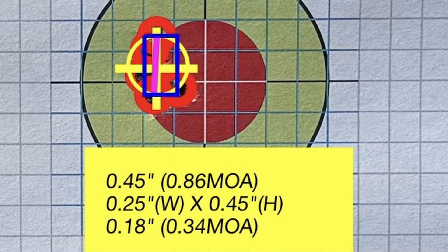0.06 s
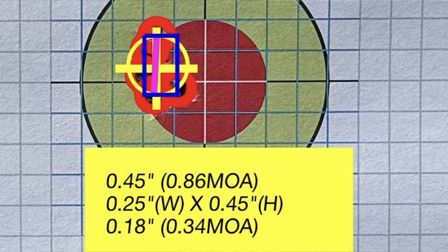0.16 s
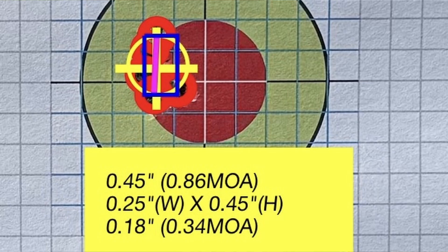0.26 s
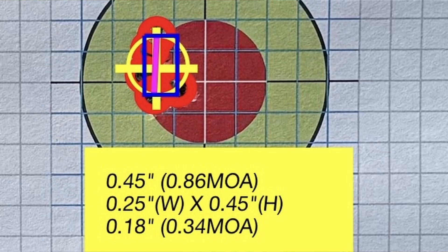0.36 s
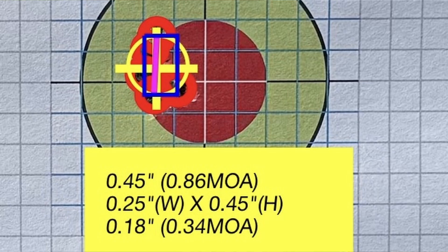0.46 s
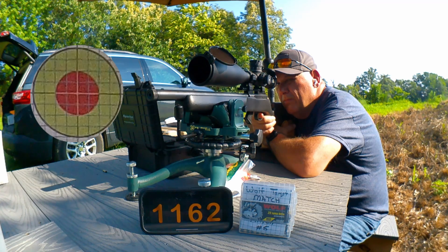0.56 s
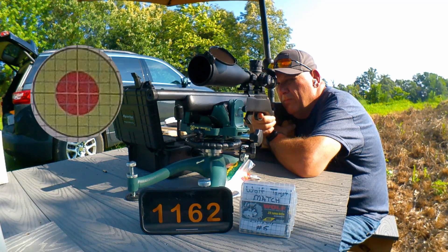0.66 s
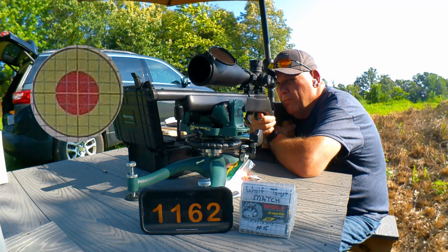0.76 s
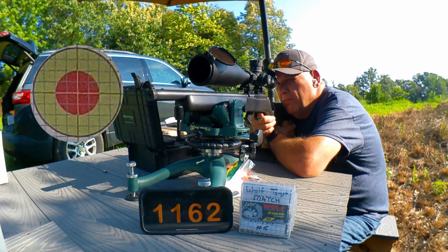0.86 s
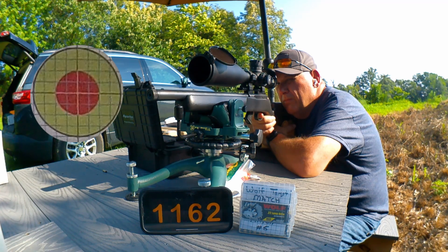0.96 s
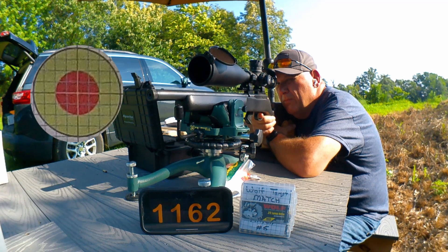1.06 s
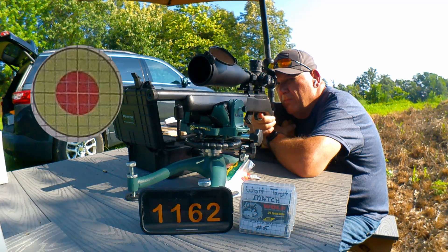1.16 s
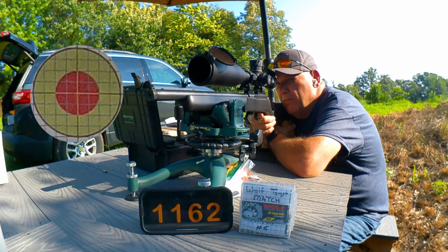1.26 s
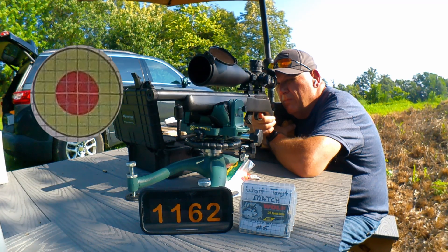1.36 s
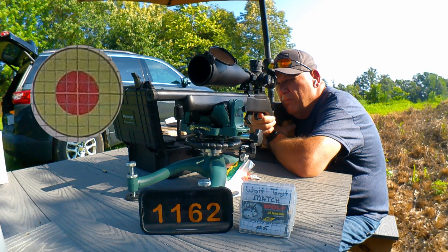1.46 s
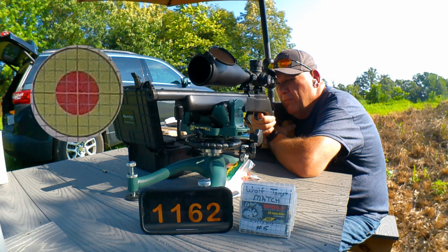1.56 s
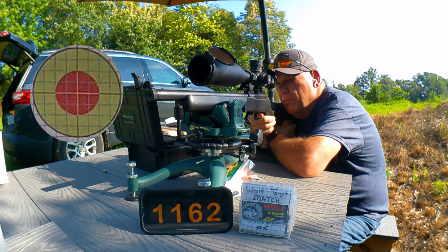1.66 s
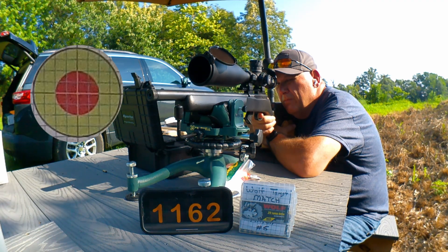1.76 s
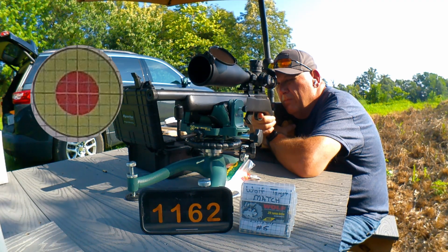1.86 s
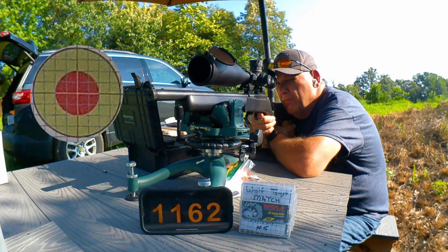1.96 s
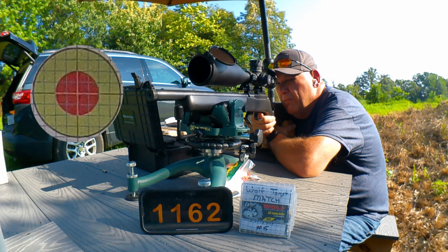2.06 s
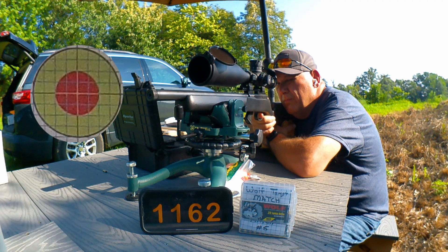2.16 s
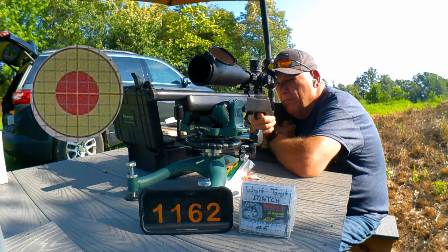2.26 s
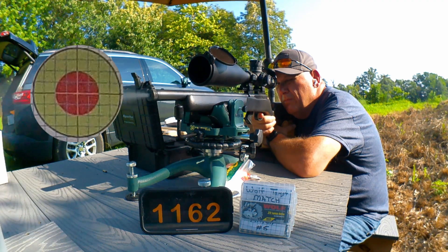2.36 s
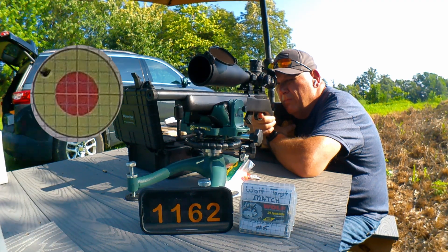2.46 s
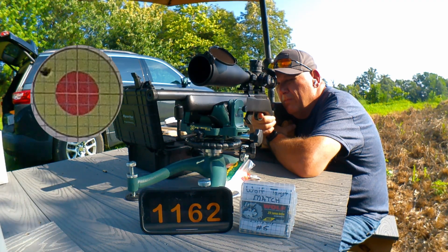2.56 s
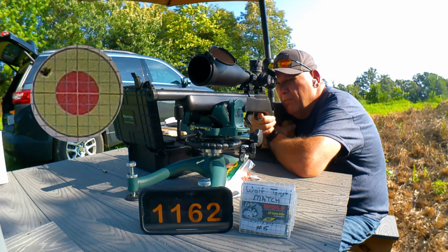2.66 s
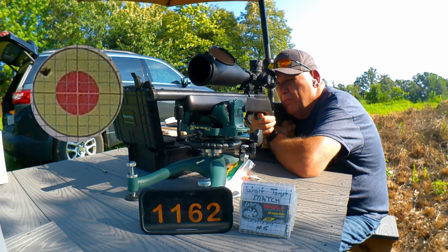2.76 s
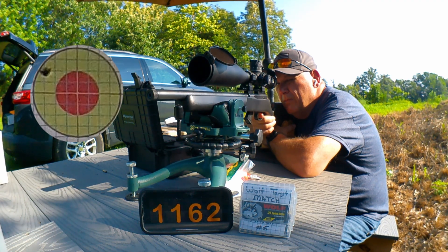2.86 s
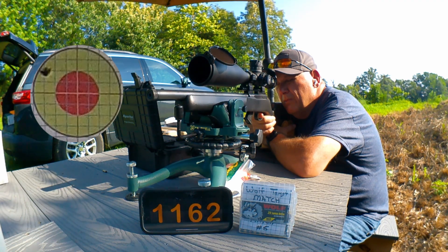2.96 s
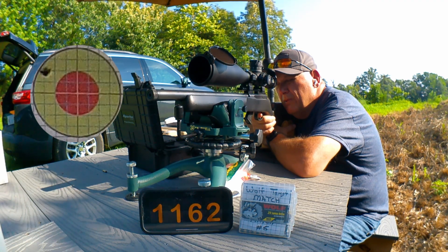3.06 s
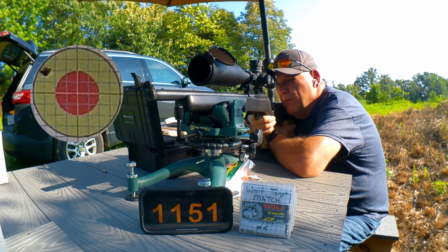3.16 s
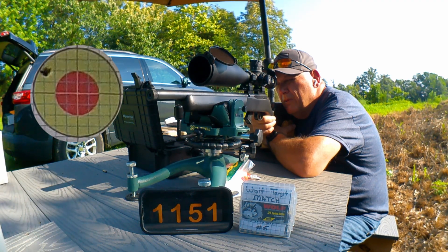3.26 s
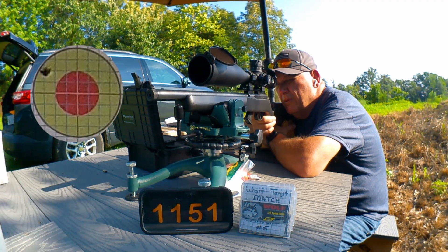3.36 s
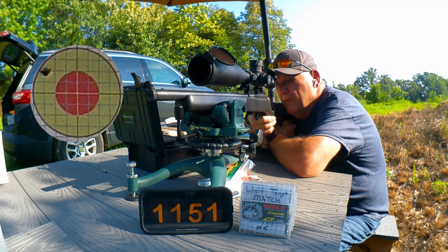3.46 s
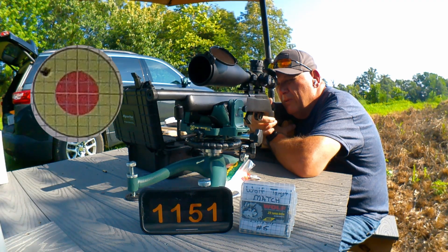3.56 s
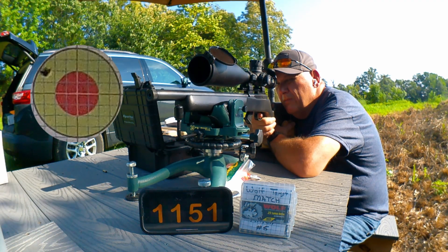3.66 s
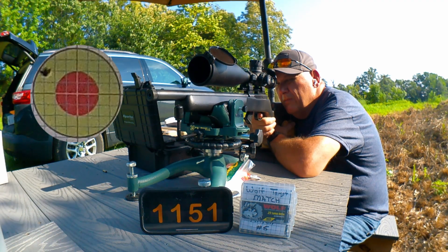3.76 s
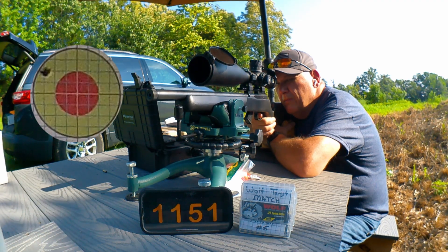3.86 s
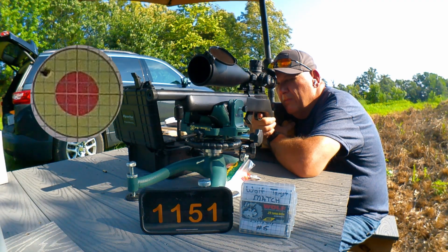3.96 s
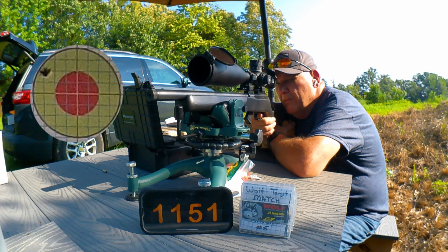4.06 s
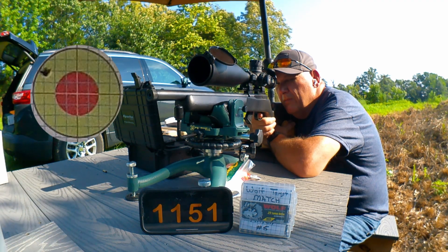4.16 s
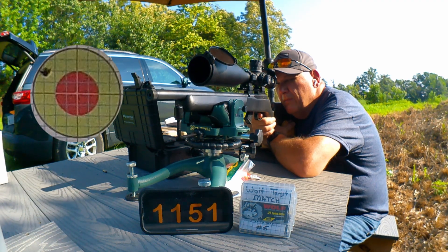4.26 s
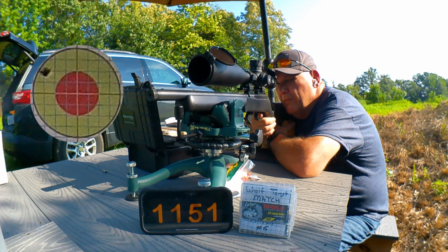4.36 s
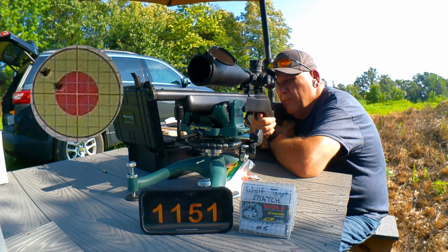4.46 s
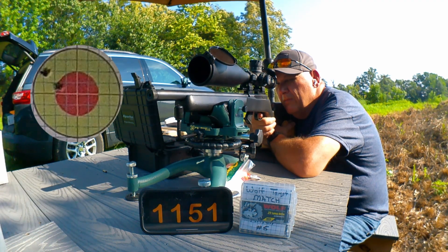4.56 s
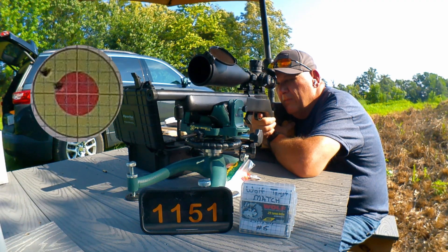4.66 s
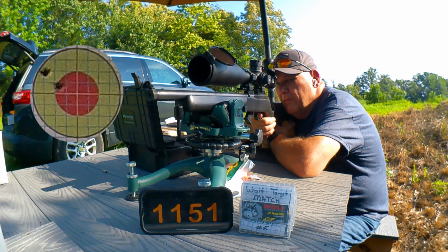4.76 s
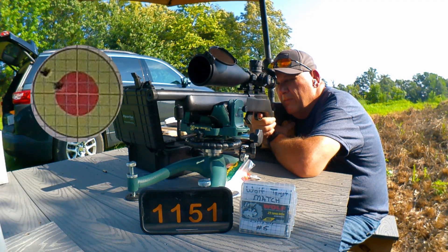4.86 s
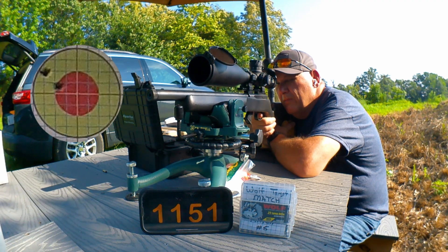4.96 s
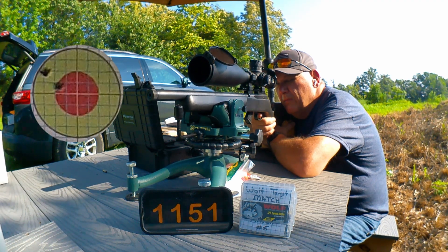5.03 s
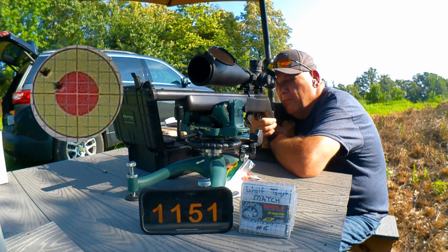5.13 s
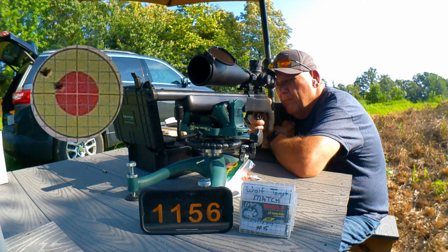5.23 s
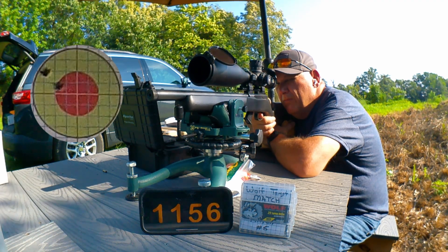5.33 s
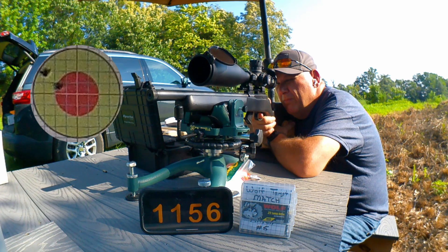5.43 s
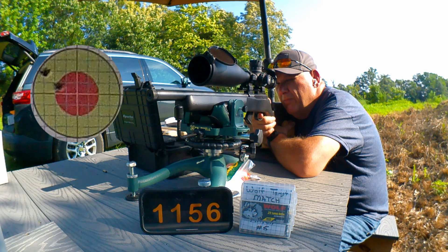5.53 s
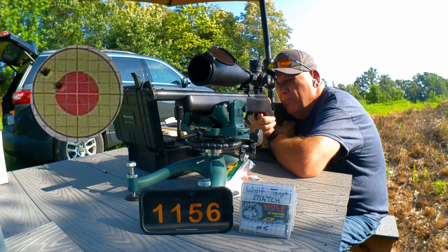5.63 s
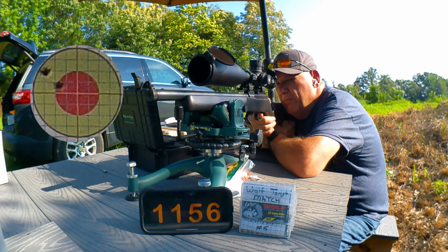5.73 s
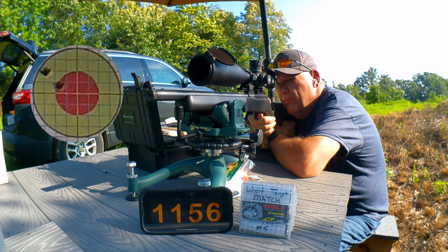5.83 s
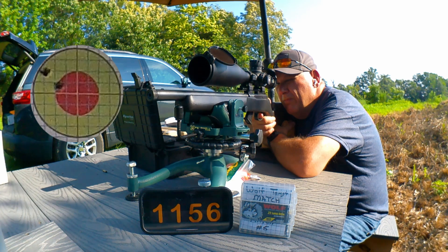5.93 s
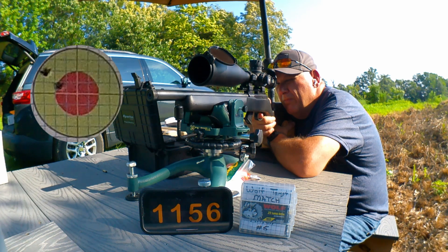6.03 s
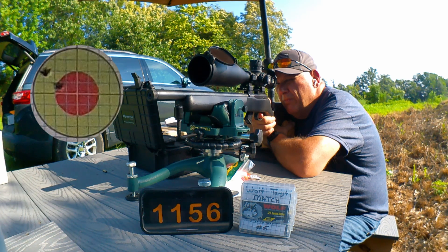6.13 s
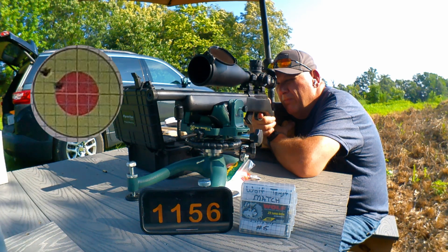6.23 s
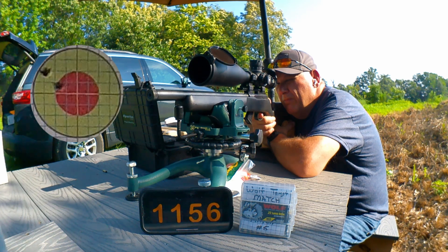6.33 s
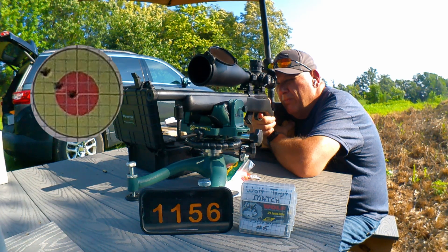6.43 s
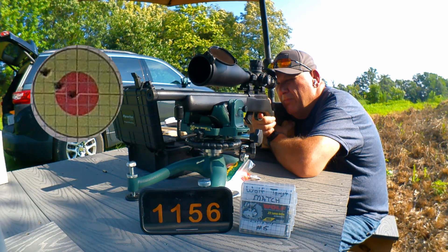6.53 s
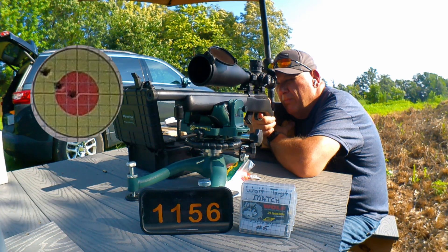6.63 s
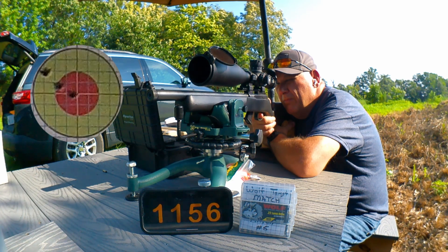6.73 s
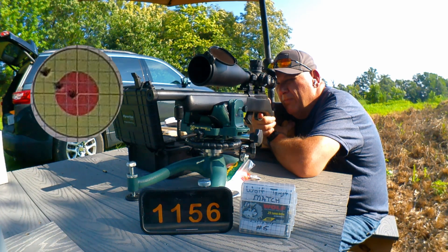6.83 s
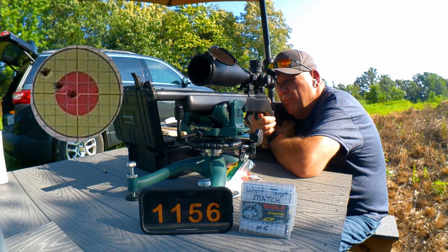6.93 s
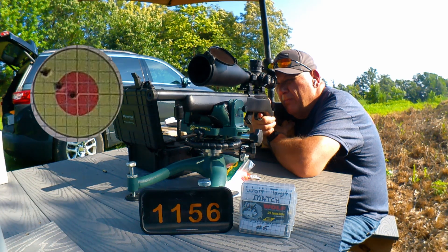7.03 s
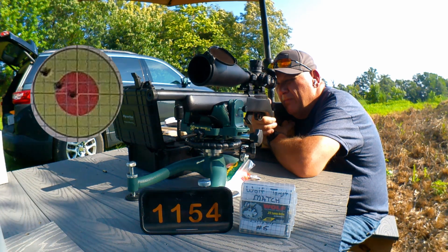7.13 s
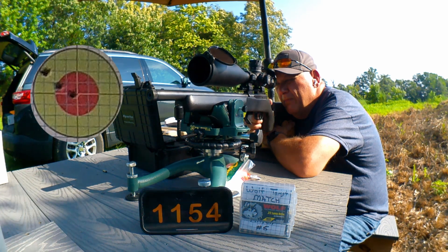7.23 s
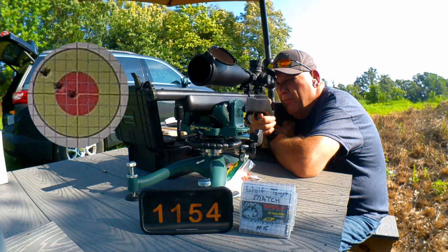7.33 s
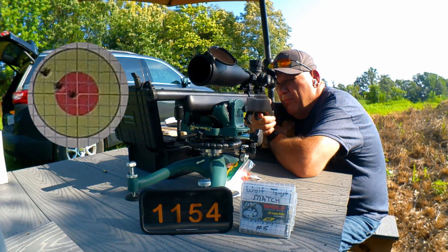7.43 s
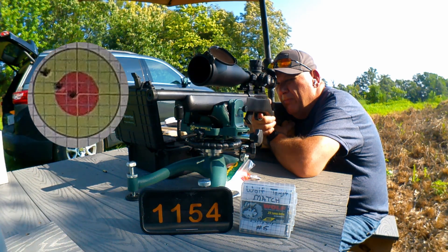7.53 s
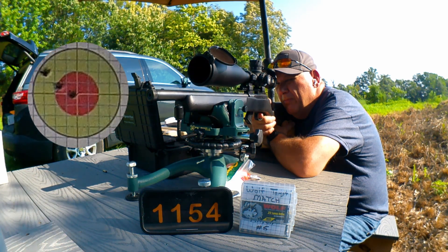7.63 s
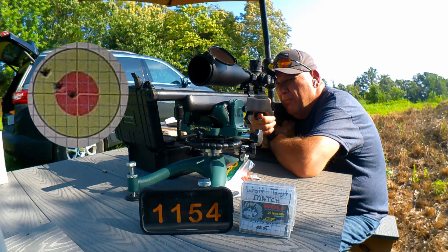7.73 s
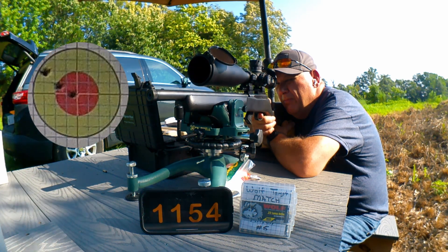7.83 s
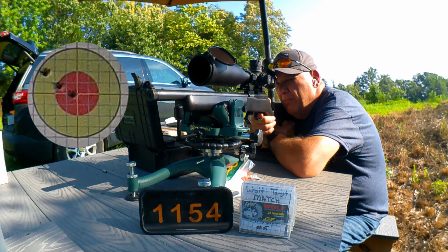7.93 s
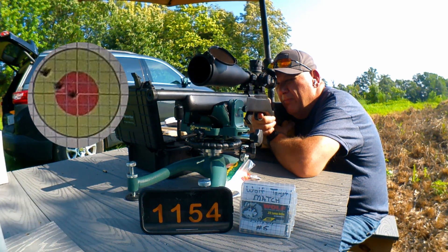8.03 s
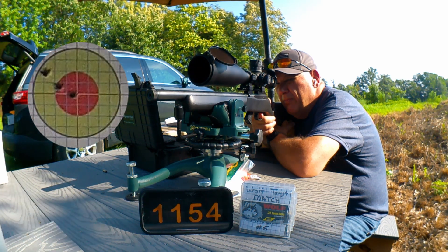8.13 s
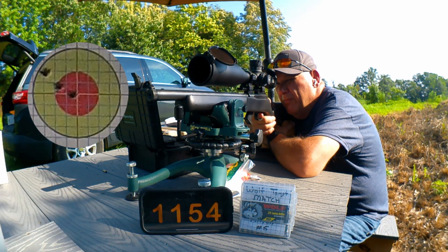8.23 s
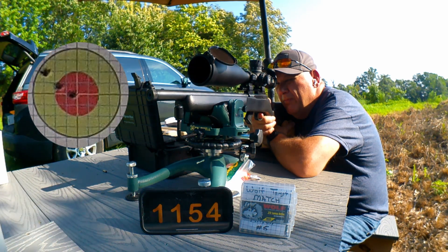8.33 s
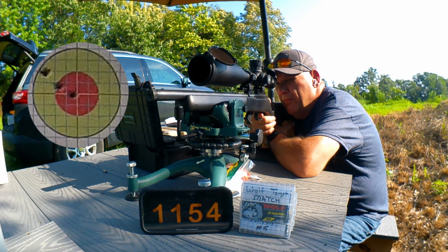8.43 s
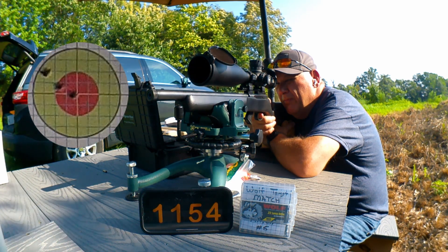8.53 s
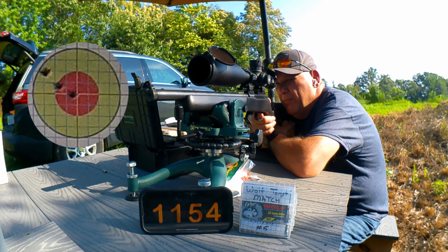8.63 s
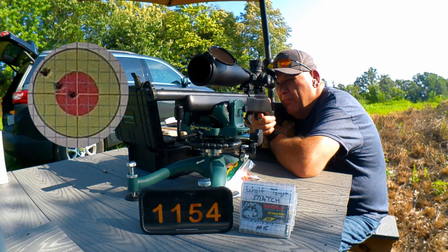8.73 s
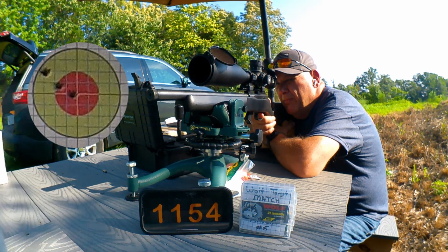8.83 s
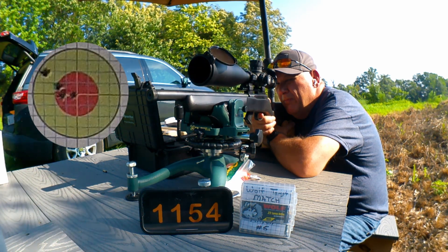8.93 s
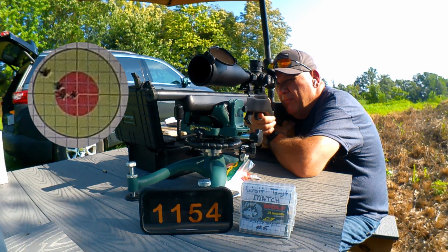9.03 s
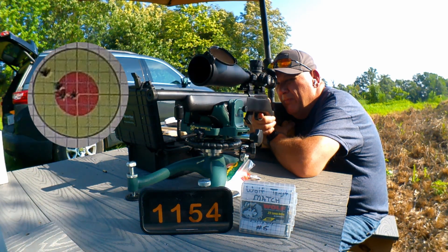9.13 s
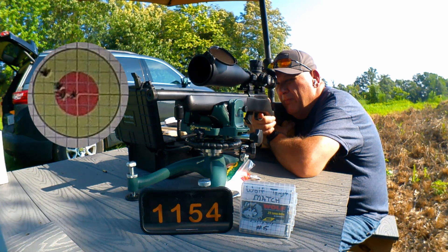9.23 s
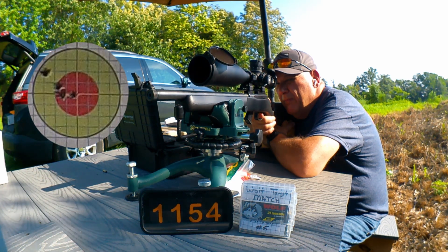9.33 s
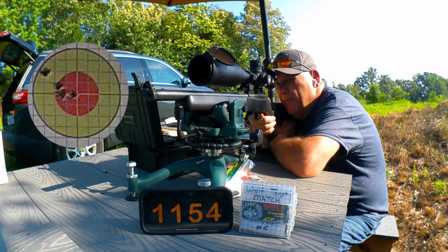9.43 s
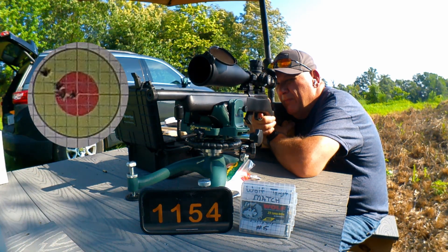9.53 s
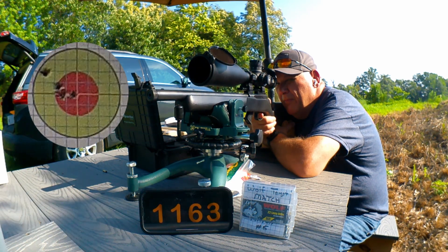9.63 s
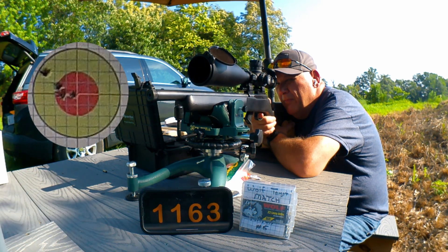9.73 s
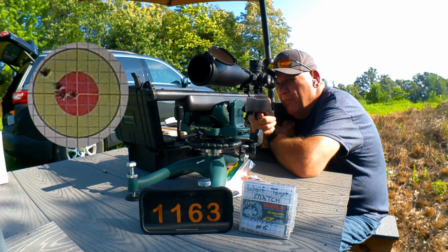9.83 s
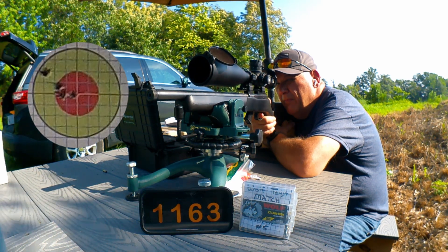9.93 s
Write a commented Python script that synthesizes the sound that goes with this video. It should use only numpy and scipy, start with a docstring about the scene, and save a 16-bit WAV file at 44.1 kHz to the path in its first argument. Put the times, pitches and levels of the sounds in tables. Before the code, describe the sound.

Quiet outdoor shooting range near woods, heard in mono from the bench. A rasping cicada cuts off early, then low wind gusts and a thin insect chorus. Four loud rifle cracks come evenly spaced, clipped at the onset, ringing briefly and washing back off grass, trees and far woods, with tails cut short. One small knock precedes the third shot, and a pulsing cicada surrounds the fourth.

```python
"""A near cicada pulses for half a second, then a far insect chorus, drone, trill and gusts lead to a rifle shot.
Four shots of a small-calibre rifle on an outdoor bench follow. In each, blast and bench ringing come first,
then the crack scattered back by the field, the target hit, and swells of noise from field, trees and far woods.
A light knock falls between the second and third; the cicada returns around the fourth.
Background levels step at the stretch bounds, which also cut the echo tails; the blasts overload the input."""
import sys
import numpy as np
from scipy import signal
from scipy.io import wavfile
from scipy.ndimage import map_coordinates

SR = 44100
rng = np.random.default_rng(int(sys.argv[2]) if len(sys.argv) > 2 else 0)


def master_out(mix):
    """Clip the mix to full scale and print it as 16-bit PCM to the path in sys.argv[1]."""
    frames = np.transpose(np.atleast_2d(mix))
    ceiling = np.clip(frames, -1, 1)
    pcm = np.round(ceiling * 32767).astype(np.int16)
    wavfile.write(sys.argv[1], SR, pcm)


N = 440559
TIME = np.arange(N) / SR
AGE = np.arange(60000) / SR  # s since the onset of a short sound
SNAP_LEAD_S = .02

# Stretches of steady background: start_s, air_db, low_insects_db, high_insects_db, drone_db, drone_hz
BACKGROUND_STRETCHES = [(0, -60, -71, -72, -68, 271), (.535, -59.5, -73.5, -67.5, -67.5, 203.9),
                        (3.61, -59, -74.5, -72.5, -73, 219.2), (5.31, -60, -74, -68, -66.5, 287.3),
                        (7.277, -57.5, -71, -75, -63, 295.2), (9.63, -57.5, -70.5, -65, -60.5, 244.5)]
# Rifle shots: start_s, crack_return_s (how long the crack keeps coming back), woods_db, last_snaps_db
RIFLE_SHOTS = [(2.3967, .1046, -3, -12.5), (4.3972, .1046, .5, -15), (6.3392, .1048, -.5, -15),
               (8.8660, .0858, 1, -15)]
# Spectrum of insect rasp, relative: freq_hz, density_db
RASP_SPECTRUM = [(1500, -14), (2200, -10), (3000, 0.5), (3500, 6.5), (4100, 5.5), (5300, 3), (6300, 0.5),
                 (7300, -5), (8600, -39.5)]


def amp(db):
    """Decibels to gain."""
    return 10 ** (np.asarray(db) / 20)


def unit(x):
    """Scales to rms 1."""
    return x / np.sqrt(np.mean(x ** 2) + 1e-20)


def add(mix, start_s, sound):
    """Mixes a sound in at start_s, truncated at the end of the mix."""
    part = mix[max(round(start_s * SR), 0):][:len(sound)]
    part += sound[:len(part)]


def dying(t60):
    """Exponential decay by 60 dB in t60 seconds."""
    return amp(-60 * AGE / t60)


def colour(x, spectrum, size=4096):
    """Minimum-phase filter of the given (Hz, dB) shape; white noise keeps its power."""
    hz, db = np.transpose(spectrum)
    bin_hz = abs(np.fft.fftfreq(size, 1 / SR))
    gain = unit(amp(np.interp(np.log(bin_hz + 1), np.log(hz + 1), db)))
    response = np.exp(np.conj(signal.hilbert(np.log(gain + 1e-6))))
    taps = np.fft.ifft(response).real
    return signal.oaconvolve(x, taps[:size // 2])[:len(x)]


def resonate(x, hz, width_hz):
    """Double-pole resonance that follows hz; shifts it to 0 Hz, filters, shifts back; output rms 1."""
    carrier = np.exp(2j * np.pi * np.cumsum(hz * np.ones(len(x))) / SR)
    r = np.exp(-np.pi * width_hz / SR)
    baseband = signal.lfilter([1], [1, -2 * r, r * r], x / carrier)
    return unit((carrier * baseband).real)


def drift(count, per_s):
    """Slow random wander of rms 1, with per_s knots a second."""
    knots = np.arange(count) * per_s / SR
    return unit(map_coordinates(rng.standard_normal(4096), [knots], order=2, mode="wrap"))


def shots(crack_db=-12, crack_t60=0.35, stop_t60=0.055, target_db=-29, target_t60=0.042, target_s=.2643,
          woods_front_db=-46.5, woods_front_t60=.1):
    """Blast, returning supersonic crack, target hit, and scattered returns from field, trees and far woods."""
    # Relative spectra: freq_hz, density_db
    crack_spectrum = [(29, -48.5), (50, -16.5), (337, -17.5), (507, -13.5), (822, -9.5), (1470, -1.5),
                      (1960, -4), (2950, -11.5), (3760, -21.5), (5270, -15), (8140, -31.5), (13500, -37),
                      (16000, -51)]
    field_spectrum = [(35, -40.5), (60, -16.5), (212, -8.5), (250, -4.5), (308, -4.5), (363, -4), (458, -5),
                      (749, -8.5), (1910, -1.5), (2470, -6), (2770, -5.5), (3760, -19.5), (5090, -9),
                      (11000, -37), (16000, -46.5)]
    trees_spectrum = [(47, -44), (80, -20), (142, -18), (303, -16.5), (338, -15), (493, -15), (687, -0.5),
                      (785, -6.5), (877, 1), (1400, -0.5), (1630, -5), (1780, -0.5), (3390, -25),
                      (5050, -20.5), (16000, -65.5)]
    woods_spectrum = [(150, -20), (400, -15.5), (750, -0.5), (1150, 4), (1900, -4.5), (2800, -22),
                      (5000, -38), (12000, -69)]
    target_spectrum = [(800, -25), (4000, 6.0), (5800, 7.5), (8500, -13.5), (16000, -18.5)]
    # Vegetation returns, near edge to far: db, edge_s, rise_db_per_s, depth_s, t60 [s], linger_db, linger_t60 [s]
    field_swell = dict(db=-37, edge_s=.11, rise_db_per_s=35, depth_s=.17, t60=.22, linger_db=-18, linger_t60=1.84)
    trees_swell = dict(db=-29.5, edge_s=.265, rise_db_per_s=260, depth_s=0.061, t60=.52, linger_db=-29, linger_t60=4.2)
    woods_swell = dict(db=-45.5, edge_s=0.6894, rise_db_per_s=200.5, depth_s=0.067, t60=.06, linger_db=-6.5, linger_t60=1.36)

    out, echoes = np.zeros(N), slaps()
    bounds_s = np.array(BACKGROUND_STRETCHES)[:, 0]
    woods = swell(**woods_swell)
    # first row of trunks: the loudest return from the woods
    add(woods, woods_swell["edge_s"], amp(woods_front_db) * dying(woods_front_t60))
    grass_rows = scatterers(change=0.37, lumpy_db=1.0)
    field_rows = scatterers(change=0.51, lumpy_db=1.5)
    leaf_rows = scatterers(change=.8, lumpy_db=1.5)
    layers = zip(RIFLE_SHOTS, muzzle(), grass_rows, field_rows, leaf_rows)
    for (start_s, crack_s, woods_db, snap_db), blast, grass, field, leaves in layers:
        # crack returns from ever farther grass until the bullet drops below the speed of sound
        flight = dying(crack_t60) * np.interp(AGE - crack_s, AGE, dying(stop_t60))
        shot = blast + echoes + amp(crack_db) * colour(grass * flight, crack_spectrum)
        shot += colour(field * swell(**field_swell), field_spectrum)
        shot += colour(leaves * swell(**trees_swell), trees_spectrum)
        shot += amp(woods_db) * colour(field * woods, woods_spectrum)
        add(shot, crack_s - SNAP_LEAD_S, amp(snap_db) * snaps())
        # target_s: bullet's flight out plus the sound's way back
        hit = rng.standard_normal(len(AGE)) * dying(target_t60)
        add(shot, target_s, amp(target_db) * colour(hit, target_spectrum))
        end_s = bounds_s[bounds_s > start_s][0]
        add(out, start_s, shot * (start_s + AGE < end_s))
    return out


def muzzle(burst_db=0, ring_db=-10, burst_t60=0.087, push_db=-1, push_s=0.0036):
    """Per shot: a pressure push with its undershoot, a noise burst of near reflections, and modal ringing."""
    # Modes of bench, rifle and shelter: freq_hz, level_db (before ring_db), t60_s
    bench_modes = [(146, -7, 0.084), (197.3, -4, 0.14), (296.6, -1.5, .11), (348, -8, .1), (401, -7.5, .09),
                   (480, -3, .09), (577, -7.5, .1), (689, -2, 0.13), (824, -9.5, .15), (987, -1, .13),
                   (1108.5, -2, 0.15), (1210, 2.5, .11), (1328, -1.5, 0.096), (1438, -4.5, 0.099),
                   (1563, -7.5, .17), (1610, -3, .14), (1793, -5.5, .13), (1963, -7, .13),
                   (2060, -6.5, 0.15), (2250, -7.5, 0.15), (2505, -5.5, .1), (3124, -14, .13),
                   (3930, 0.5, 0.07), (4430, -12.5, 0.082)]
    # Relative spectrum: freq_hz, density_db
    blast_spectrum = [(25, -5), (80, -9), (200, -12), (450, -9), (800, -7), (1300, -3), (2300, -4),
                      (3200, -12), (5500, -12.5), (8000, -21), (16000, -28)]
    ring = np.zeros(len(AGE))
    for hz, db, t60 in bench_modes:
        phase_turns = rng.random()
        ring += amp(db) * dying(t60) * np.sin(2 * np.pi * (hz * AGE + phase_turns))
    push = (1 - AGE / push_s) * np.exp(-AGE / push_s)
    common = amp(ring_db) * ring + amp(push_db) * push
    return [amp(burst_db) * colour(row * dying(burst_t60), blast_spectrum) + common
            for row in scatterers(change=0.3, lumpy_db=-0.5)]


def slaps(front_db=12, air_hz_s=380):
    """Hard surfaces each return a sharp front and a short scatter, duller the longer the path."""
    # Single echoes from things on the range: delay_s, level_db (before filtering), t60_s
    hard_echoes = [(0.0447, -7, 0.017), (0.057, -9.5, 0.053), (0.0944, -19.5, .03), (.156, -18.5, 0.013),
                   (0.2592, -17.5, 0.012), (.307, -19, 0.029)]
    spectrum = [(50, -12.5), (250, -6.5), (500, -7), (1000, 1.5), (1800, 3.5), (3000, -11), (5500, -15.5),
                (9000, -25.5), (16000, -43.5)]
    out = np.zeros(len(AGE))
    for delay_s, db, t60 in hard_echoes:
        scatter = dying(t60) * rng.choice([-1, 1], len(AGE))
        echo = scatter + amp(front_db) * (AGE == 0)
        air = signal.butter(1, min(air_hz_s / delay_s, SR / 3), fs=SR)
        add(out, delay_s, amp(db) * signal.lfilter(*air, echo))
    return colour(out, spectrum)


def scatterers(change, lumpy_db):
    """One row of reflections a shot: the ground stays still, moving air changes a share."""
    ground = rng.standard_normal(len(AGE)) * amp(lumpy_db * drift(len(AGE), per_s=400))
    fresh = rng.standard_normal((len(RIFLE_SHOTS), len(AGE)))
    return (unit(ground) + change * fresh) / np.hypot(1, change)


def swell(db, edge_s, rise_db_per_s, depth_s, t60, linger_db, linger_t60):
    """Gain of a stand's return against shot age: rise to its near edge, hold over its depth, decay, slow tail."""
    attack = amp(rise_db_per_s * np.minimum(AGE - edge_s, 0))
    past_s = np.maximum(AGE - edge_s - depth_s, 0)
    release = np.maximum(amp(-60 * past_s / t60), amp(linger_db - 60 * past_s / linger_t60))
    return amp(db) * attack * release


def snaps():
    """Last, brightest reflections of the crack: decaying noise, timed from SNAP_LEAD_S before its end."""
    # Reflections: offset_s from the end of the crack, level_db (before the shot's snap level), t60_s
    last_snaps = [(-.0102, -12.5, .035), (0, 2, 0.011), (.0045, -11, .012)]
    # Relative spectrum: freq_hz, density_db
    snap_spectrum = [(500, -21), (2000, 5.5), (3800, -10), (5800, 3.5), (8000, -9.5), (11000, -4.5),
                     (16000, -23)]
    out = np.zeros(len(AGE))
    for offset_s, db, t60 in last_snaps:
        add(out, offset_s + SNAP_LEAD_S, amp(db) * dying(t60) * rng.standard_normal(len(AGE)))
    return colour(out, snap_spectrum)


def cicada(top_hz=5200, low_hz=3500, smear=0.19, throb=.06, reset=0.49, gap_at=0.42):
    """Tymbal clicks ring an abdomen whose resonance swoops down on every beat and lands on a held note."""
    # Calls: start_s, end_s, beat_s (time of one beat), beats_per_s, clicks_per_s, click_jitter (share),
    # sweep_db, rasp_db, note_db, note_hz, note_width_hz; levels before the beat gaps
    calls = [(0, 0.53, .05, 12.4, 420, .005, -65, -60, -61, 2450, 480),
             (7.282, 9.622, 7.308, 11.61, 420, .014, -61, -58.5, -60, 2447, 996)]
    out = np.zeros(N)
    sweep_width_hz, hold_db, gap_depth = 1500, 25, .42
    for (start_s, end_s, beat_s, rate, click_hz, jitter,
         sweep_db, rasp_db, note_db, note_hz, note_width_hz) in calls:
        beats = rate * (TIME - beat_s) + 0.036 * drift(N, per_s=8.9)
        turns = np.cumsum(click_hz * (1 + jitter * drift(N, per_s=150))) / SR
        clicks = np.diff(np.floor(turns), prepend=0)
        scrape = rng.standard_normal(N)
        drive = unit(clicks + smear * scrape)

        tension = np.cos(np.pi * (beats - reset)) ** 2
        sweep_hz = low_hz + (top_hz - low_hz) * tension
        sweep = resonate(drive, sweep_hz, sweep_width_hz) * (.5 + tension)
        note_drive = colour(clicks + smear / 2 * scrape, RASP_SPECTRUM)
        note = resonate(note_drive, note_hz, note_width_hz)
        note *= unit(amp(hold_db * abs(np.cos(np.pi * beats))))
        rasp = colour(drive, RASP_SPECTRUM) * (1 + throb * np.cos(2 * np.pi * beats))

        # the tymbals ease before each swoop
        slack = 1 - gap_depth * np.cos(np.pi * (beats - gap_at)) ** 20
        call = amp(sweep_db) * sweep + amp(note_db) * note + amp(rasp_db) * rasp
        out += call * slack * (TIME >= start_s) * (TIME < end_s)
    return out


def ticks(t60=.03):
    """Light knocks of gear on the bench: decaying coloured noise."""
    # Knocks: start_s, level_db
    knocks = [(5.256, -45.5)]
    out = np.zeros(N)
    for start_s, db in knocks:
        knock = rng.standard_normal(len(AGE)) * dying(t60)
        add(out, start_s, amp(db) * colour(knock, [(100, 1), (2000, 7), (6000, -7), (14000, -34)]))
    return out


def outdoors(low_band_hz=2950, low_width_hz=650, flutter_db=-1.0, pulse_rate=15.0, pulse_db=1.8,
             drone_width_hz=170):
    """Filtered noise for still air, a far drone, two bands of fluttering far insects and a gliding trill."""
    # Relative spectra: freq_hz, density_db
    air_spectrum = [(15, -43), (25, -15.5), (70, -7.5), (110, -4), (223, -9.5), (416, -13), (451, -12.5),
                    (503, -13.5), (714, -15), (775, -17.5), (840, -17.5), (2550, -23), (2990, -27),
                    (3720, -31.5), (5880, -30), (16000, -39)]
    chorus_spectrum = [(2000, -24), (3500, -9.5), (4200, -5), (4800, -1), (5400, 1.5), (6500, -6),
                       (7500, -14.5), (9000, -41)]
    # Far trill, interpolated: time_s, freq_hz, level_db
    trill_track = [(1.99, 3148, -85), (2.015, 3060, -60), (2.05, 2830, -70), (2.2, 2810, -71),
                   (2.4, 2800, -78.5), (2.6, 2800, -88.5)]
    hiss_spectrum = [(3000, 0.5), (8000, -2), (9800, -0.5), (11000, -1.5), (16000, -5)]
    table = np.array(BACKGROUND_STRETCHES)
    stretch = np.searchsorted(table[1:, 0], TIME)
    air_db, low_db, high_db, drone_db, drone_hz = table[stretch, 1:].T
    air, low, high, trill, hiss, drone = rng.standard_normal((6, N))

    lowpass = signal.butter(1, 3500, fs=SR, output="sos")
    distant = signal.sosfilt(lowpass, colour(air, air_spectrum))
    out = amp(air_db) * distant + amp(-74.5) * colour(hiss, hiss_spectrum)
    out += amp(drone_db) * resonate(drone, drone_hz, drone_width_hz)

    pulsing = amp(pulse_db * np.sin(2 * np.pi * pulse_rate * TIME + drift(N, per_s=2)))
    insects = amp(low_db) * resonate(low, low_band_hz, low_width_hz)
    insects += amp(high_db) * pulsing * colour(high, chorus_spectrum)
    out += insects * amp(flutter_db * drift(N, per_s=32))

    time_s, hz, db = np.transpose(trill_track)
    trill_gain = amp(np.interp(TIME, time_s, db, left=-np.inf, right=-np.inf))
    out += trill_gain * resonate(trill, np.interp(TIME, time_s, hz), width_hz=180)
    return out


def wind(exposure_db=-7, eddy_db=2.5, eddies_per_s=12):
    """Rumble on the microphone: bell-shaped gusts over an easing light breeze, broken up by eddies."""
    # Gusts: peak_s, length_s, level_db (before exposure_db)
    gust_table = [(0.022, 0.13, -44), (.41, .1, -46), (.7, .07, -46), (.85, .12, -41), (1.003, .14, -42.5),
                  (1.5, 0.33, -51), (2.3, .15, -51), (2.87, .1, -46), (3.21, 0.074, -47), (3.4, 0.34, -47),
                  (5.28, .06, -49), (7.261, .08, -52)]
    # Breeze, interpolated: time_s, level_db (before exposure_db)
    breeze_track = [(0, -56), (3.4, -56), (4, -62), (7, -65), (10, -68)]
    # Relative spectrum: freq_hz, density_db
    wind_spectrum = [(15, -3.5), (45, 0.5), (90, -6.5), (200, -19), (500, -45.5), (2000, -70)]
    gusts = sum(amp(db) * np.exp(-(2 * (TIME - peak_s) / length_s) ** 2) for peak_s, length_s, db in gust_table)
    breeze = amp(np.interp(TIME, *np.transpose(breeze_track)))
    force = np.hypot(gusts, breeze)
    eddies = amp(exposure_db + eddy_db * drift(N, per_s=eddies_per_s))
    return force * eddies * colour(rng.standard_normal(N), wind_spectrum)


def scene():
    """Everything at the microphone, one channel."""
    return (shots() + cicada() + outdoors() + wind() + ticks())[None]


def record(dry, ceiling=0.54, knee=5, edge_hz=16000):
    """Input overload flattens peaks near the ceiling; then a low-pass band limit."""
    clipped = dry / (1 + abs(dry / ceiling) ** knee) ** (1 / knee)
    band_limit = signal.firwin(255, edge_hz, window=("kaiser", 9), fs=SR)
    return signal.oaconvolve(clipped, band_limit[None], "same")


dry = scene()
out = record(dry)
master_out(out)
```